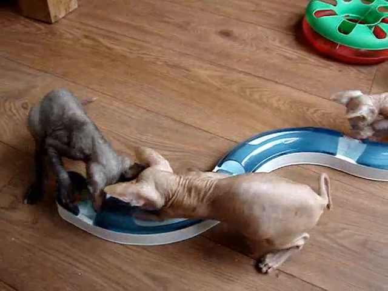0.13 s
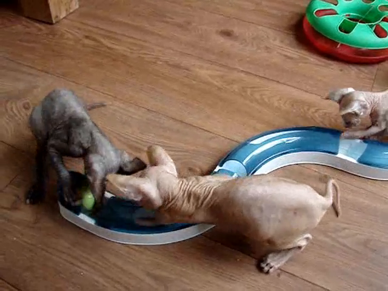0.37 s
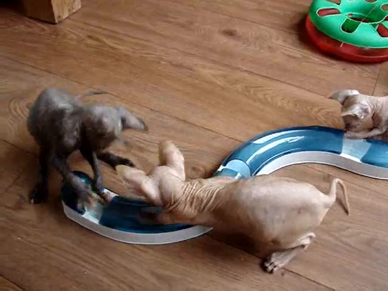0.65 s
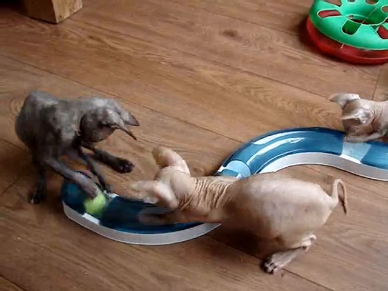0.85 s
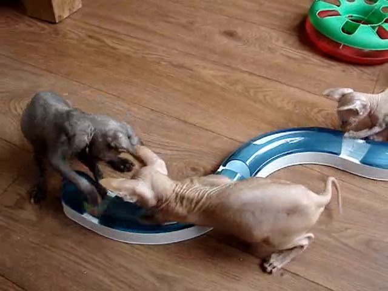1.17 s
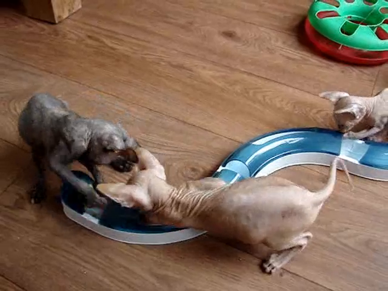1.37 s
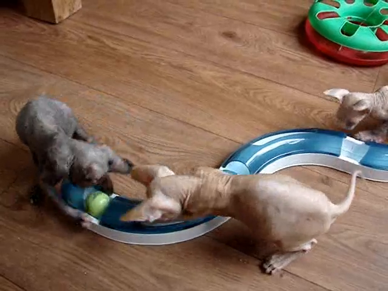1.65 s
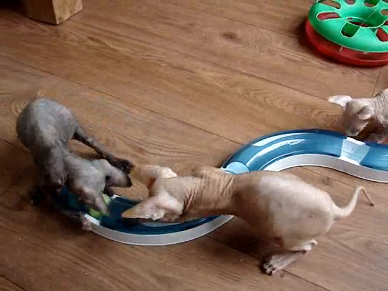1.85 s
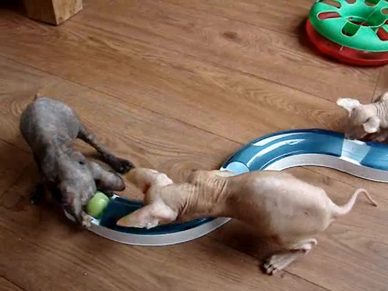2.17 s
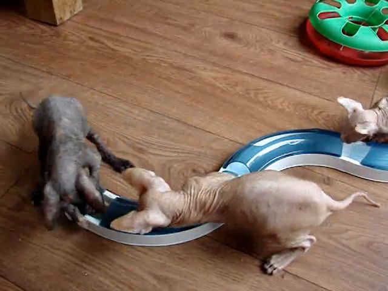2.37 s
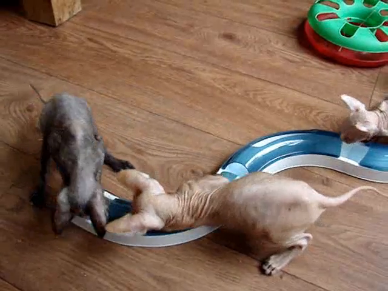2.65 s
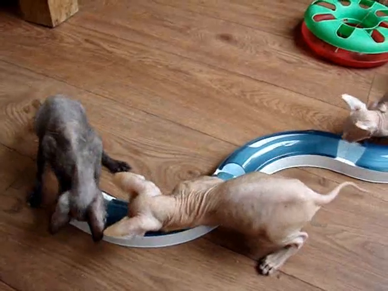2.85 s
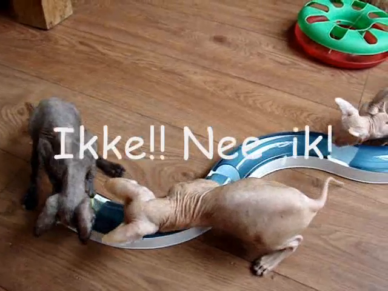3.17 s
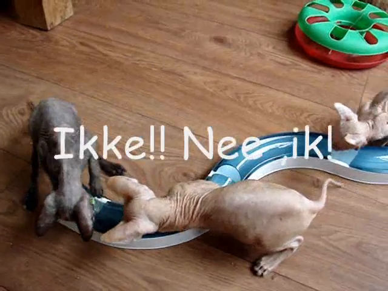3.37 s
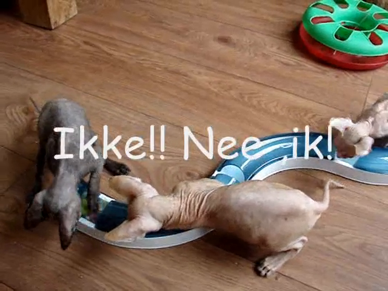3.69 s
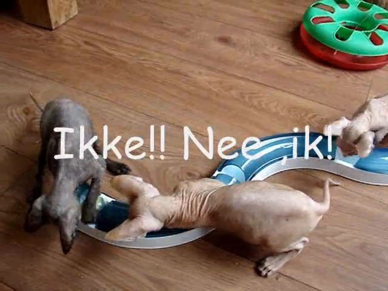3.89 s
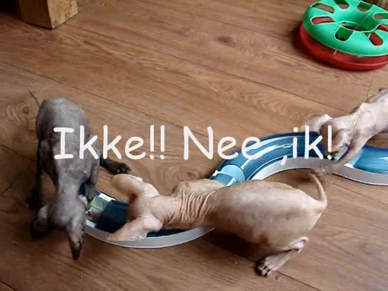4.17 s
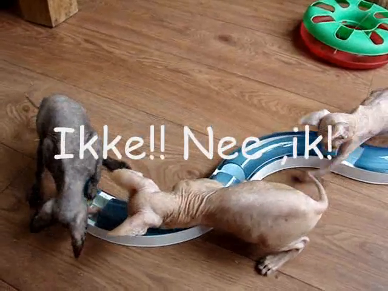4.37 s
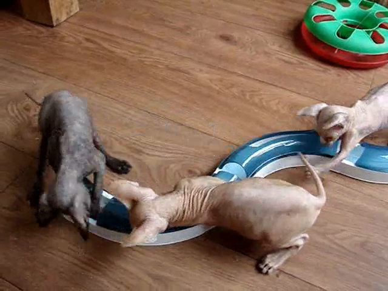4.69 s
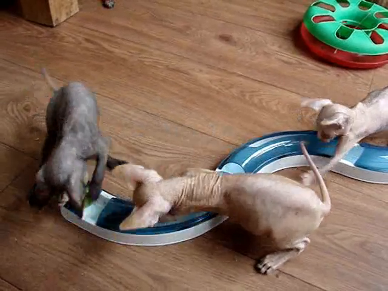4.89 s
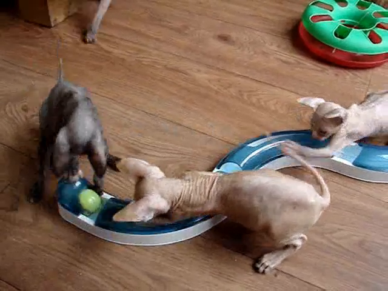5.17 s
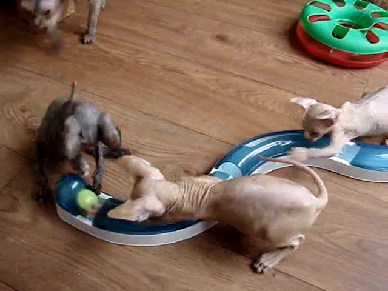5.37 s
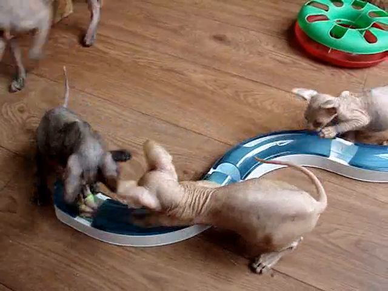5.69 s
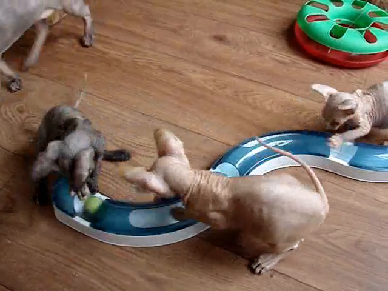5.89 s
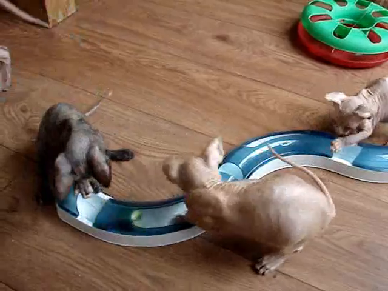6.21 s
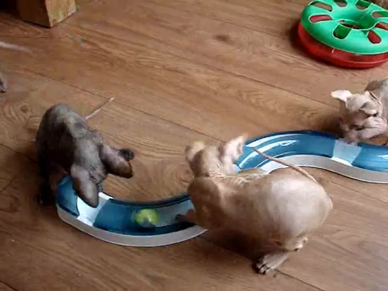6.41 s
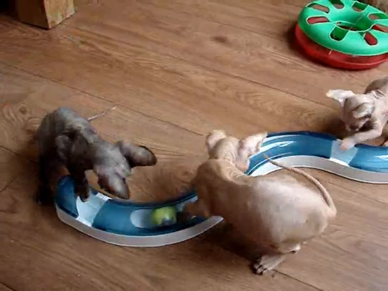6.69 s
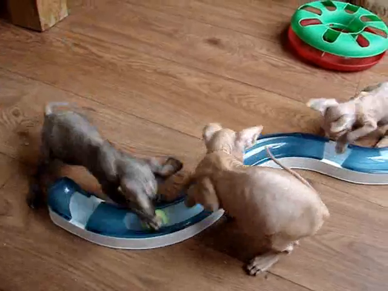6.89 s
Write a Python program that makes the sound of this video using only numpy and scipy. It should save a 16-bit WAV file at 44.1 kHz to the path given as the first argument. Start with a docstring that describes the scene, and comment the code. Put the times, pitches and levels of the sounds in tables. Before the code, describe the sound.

A kitten's paws scuff and knock a hollow ball in a plastic track, in a small live room with a wooden floor and faint steady hiss. From 0 to 0.9 s, quick uneven clicks and rattles cluster together over a soft rolling rumble. At about 1.05 s the loudest swipe cracks the plastic, thumps the boards and makes the ball sing near 2 kHz; low floor grumbles and bumps follow until 1.35 s. Sharp bright clacks come around 1.6, 1.9, 2.1 and 2.3 s, then scuffs and a brief ring at 2.5 and 2.9 s. Softer padded knocks from 3.3 s grow into a busy rattle around 4.0 to 4.5 s. More taps come at 5.0, a sharp clack at 5.3 and a dull knock at 5.5, then a small ring at 5.6 s. The ball glides quietly, bumping track joints from 6.2 to 6.5 s, before light scuffs and taps at 6.7 and 7.0 s.

```python
"""In a small live room with a wooden floor, kittens bat a hollow ball inside a plastic track.
Ball and claws click on the shell and padded paws knock it: short pushes and rattles ring the shell's modes.
Scuffs are swells of tiny slips; after square blows the ball sings on, as a few fading sine tones.
The ball rolls with a soft rumble of filtered noise and rubs the shell, more so after each blow.
One hard swipe thumps the track on the boards and the floor grumbles, over a steady background hiss."""
import sys
import numpy as np
from scipy import signal
from scipy.fft import rfft, irfft, next_fast_len
from scipy.io import wavfile
from scipy.ndimage import map_coordinates

SR = 44100
rng = np.random.default_rng(int(sys.argv[2]) if len(sys.argv) > 2 else 0)


def pcm_store(signal):
    """Save signal as 16-bit PCM."""
    levels = np.round(np.clip(np.atleast_2d(signal), -1, 1) * 32767)
    wavfile.write(sys.argv[1], SR, levels.astype(np.int16).T)


N = 310905  # length of the scene in samples
SPAN = 8192  # length of one short sound in samples
CLOCK = np.arange(SPAN) / SR  # time within a short sound, in seconds


def amp(db):
    """Turn decibels into gain."""
    return 10 ** (np.asarray(db) / 20)


def unit(x):
    """Scale to an rms of 1."""
    return x / np.sqrt(np.mean(x ** 2) + 1e-20)


def along(points, hz):
    """Read a curve of (frequency, value) points on a log frequency axis."""
    f, v = np.transpose(points)
    return np.interp(np.log(hz + 1), np.log(f), v)


def wobble(rate):
    """A smooth random curve with this many random knots a second."""
    knots = rng.standard_normal(int(N * rate / SR) + 4)
    return map_coordinates(knots, [np.arange(N) * rate / SR])


def hump(middle, half):
    """A smooth swell of height 1 around a moment."""
    return np.exp(-((np.arange(N) / SR - middle) / half) ** 2)


def add(track, s, sound):
    """Mix a sound into the track at time s."""
    start = max(round(s * SR), 0)
    part = sound[:max(N - start, 0)]
    track[start:start + len(part)] += part


def resonance(hz, centre, width):
    """Response of one mode: it favours its own pitch and rings on after a push."""
    return 1j * hz * width / (centre ** 2 - hz ** 2 + 1j * hz * width)


def body(modes, hz):
    """Response of an object: the sum of its modes."""
    return sum(amp(db) * resonance(hz, centre, width) for centre, width, db in modes)


def causal(points):
    """Minimum-phase response with the given spectrum, so its energy comes as early as it can."""
    cepstrum = irfft(np.log(amp(along(points, np.fft.rfftfreq(SPAN, 1 / SR)))))
    cepstrum[1:SPAN // 2] *= 2
    cepstrum[SPAN // 2 + 1:] = 0
    return np.exp(rfft(cepstrum))


def filtered(x, response):
    """Shape x by a response that is a function of frequency."""
    size = next_fast_len(len(x) + SPAN)
    return irfft(rfft(x, size) * response(np.fft.rfftfreq(size, 1 / SR)), size)[:len(x)]


# how long the room rings: (frequency [Hz], time to fade by 60 dB [s])
ROOM_DECAY = [(200, 0.33), (800, 0.56), (2000, 0.46), (5500, 0.43), (11000, 0.53)]


def in_room(direct, radiated, tail_db, early_db, early_t60=0.03, build=0.0066):
    """The direct sound plus echoes of what is radiated all round: sharp early ones and a smooth tail."""
    hz, t, z = signal.stft(rng.standard_normal(SR // 2), SR, nperseg=256)
    # each pitch of the noise fades at its own pace
    tail = signal.istft(z * amp(-60 * t / along(ROOM_DECAY, hz)[:, None]), SR)[1]
    t = np.arange(len(tail)) / SR
    tail *= 1 - np.exp(-t / build)
    # cubed noise is spiky, like separate echoes; none comes in the first 5 ms
    early = rng.standard_normal(len(t)) ** 3 * amp(-60 * t / early_t60) * (t > .005)
    tail_part = amp(tail_db) * tail / np.linalg.norm(tail)
    early_part = amp(early_db) * early / np.linalg.norm(early)
    heard = signal.fftconvolve(radiated, tail_part + early_part)
    heard[:SPAN] += direct
    return heard


# spectrum of the steady background: (frequency [Hz], relative level [dB])
BACKGROUND_TONE = [(20, -8), (60, -5.5), (150, -4.5), (280, 3), (700, -5), (1300, -3), (3000, -10),
                   (6000, -14), (10000, -18.5), (11400, -36.5), (13000, -55)]


def background(level_db=-53):
    """Steady room noise and microphone hiss: random noise shaped by a fixed spectrum."""
    return amp(level_db) * unit(filtered(rng.standard_normal(N), lambda hz: amp(along(BACKGROUND_TONE, hz))))


# weight shifting on the boards: (time [s], relative level [dB])
WEIGHT_SHIFTS = [(1.059, -5), (1.19, -1.5), (1.28, -9.5), (1.4, -51)]


def boards(level_db=-48, low_hz=230, width_hz=340):
    """After the hard swipe the floor grumbles in a low band while the kitten shifts its weight."""
    s, db = np.transpose(WEIGHT_SHIFTS)
    swell = amp(np.interp(np.arange(N) / SR, s, db, left=-120, right=-120))
    grumble = unit(filtered(rng.standard_normal(N), lambda hz: resonance(hz, low_hz, width_hz) ** 2))
    return amp(level_db) * swell * grumble


# resonances of the plastic shell: (frequency [Hz], width [Hz], relative level [dB])
SHELL_MODES = [(1570, 760, -1.5), (1611, 38, 3), (1952, 91, 8), (2190, 75, 17), (2444, 230, 16.5),
               (2890, 780, 14), (3750, 1800, 14), (4740, 85, -5)]
# spectrum of the treble click: (frequency [Hz], relative level [dB])
CLICK_TONE = [(1500, -39.5), (3500, 6), (4500, 9), (5400, 4), (6600, 4), (8000, 1), (9400, -3),
              (10400, -53), (11300, -20), (13000, -29.5)]
# spectrum of the low knock: (frequency [Hz], relative level [dB])
KNOCK_TONE = [(60, -31), (170, -23), (280, -6), (500, -3), (700, 1.5), (900, -4), (1150, -7.5), (1800, -42)]
PING_HZ, PING_DB = 10130, -25  # a thin, high ring on every contact: pitch, level over the main ring


def shell_colours():
    """Responses that every contact shares: shell modes, click, knock and ping."""
    hz = np.fft.rfftfreq(SPAN, 1 / SR)
    ping = resonance(hz, PING_HZ, 820) ** 2
    return body(SHELL_MODES, hz), causal(CLICK_TONE), causal(KNOCK_TONE), ping


CUT_ON_HZ = 1294  # the shell radiates poorly below this


def plastic(force, grit, ring_hz, click_db, knock_db, colours, sharpness=1.9, shell_share=0.3, softness=1.37):
    """The spot that is touched picks which shell modes the force rings; fine grit makes the treble click."""
    hz = np.fft.rfftfreq(SPAN, 1 / SR)
    shell, click, knock, ping = colours
    spot = resonance(hz, ring_hz, ring_hz / sharpness) * resonance(hz, ring_hz, ring_hz * 5.0)
    # a contact of finite length cannot drive modes far above its own pitch
    ratio = hz / (softness * ring_hz)
    spot = spot / (1 - ratio ** 2 + 1j * np.sqrt(2) * ratio)
    cut_on = resonance(hz, CUT_ON_HZ, 240) * 1j * hz
    responses = np.array([spot * cut_on * (1 + shell_share * shell), click, knock, ping])
    parts = irfft(rfft(np.array([force, grit, force, grit])) * responses)
    parts /= np.linalg.norm(parts, axis=1, keepdims=True)
    return amp([0, click_db, knock_db, PING_DB]) @ parts


# levels over the ring at hardness 0 and 1, before each source's trim
SOFT_CLICK_DB, HARD_CLICK_DB = -31, 3.5
SOFT_KNOCK_DB, HARD_KNOCK_DB = -4.5, -23.5
# the track gives: dB of knock lost for each dB that a blow is over the usual one, within limits
USUAL_DB, KNOCK_GIVE = -36, 0.71


def touch(db, hardness):
    """Levels of click and knock over the ring: hard contacts click, soft ones knock."""
    click_db = SOFT_CLICK_DB + hardness * (HARD_CLICK_DB - SOFT_CLICK_DB)
    knock_db = SOFT_KNOCK_DB + hardness * (HARD_KNOCK_DB - SOFT_KNOCK_DB)
    return click_db, knock_db - KNOCK_GIVE * np.clip(db - USUAL_DB, -8, 6)


SPIN_DB, SPIN_T60_S = -12, 0.83  # rub against a fully padded blow's table level; time to fade by 60 dB


def spin():
    """Strength of the ball's spin: each blow adds to it, padded ones most, and friction wears it down."""
    kicks = np.zeros(N)
    for s, db, ring_hz, hardness in BLOWS:
        add(kicks, s, [amp(db + SPIN_DB) ** 2 * max(1 - hardness, 0)])
    kept_per_sample = amp(-60 / (SPIN_T60_S * SR)) ** 2
    return np.sqrt(signal.lfilter([1], [1, -kept_per_sample], kicks))


JOINT_HALF_S = 0.017  # half length of a swell at a joint
GLIDE_S, GLIDE_HALF_S, GLIDE_DB = 6, 0.13, -46.5  # one long push slides the ball: middle, half length, rub level
# how briskly the ball rolls: (time [s], relative level [dB])
ROLL_PACE = [(0.0, -41.5), (0.31, -47.5), (0.94, -46), (1.2, -40), (1.35, -46), (1.8, -44.5), (2.16, -48.5),
             (2.63, -45), (3.65, -47.5), (4.12, -45), (4.69, -49.5), (4.97, -47), (5.91, -48),
             (6.36, -46.5), (6.6, -50), (7.05, -48.5)]
# the free ball bumps over joints of the track: (time [s], swell of the rumble [dB])
JOINT_BUMPS = [(6.17, 6), (6.28, 4), (6.5, 5)]
# air resonances of the channel under the ball: (frequency [Hz], width [Hz], relative level [dB])
CHANNEL_MODES = [(269.4, 8.6, -7.5), (407.5, 49, -9), (488, 12, -6), (734, 255, -5), (958, 47, -5.5)]
# spectrum of the ball's skin rubbing the shell: (frequency [Hz], relative level [dB])
RUB_TONE = [(500, -19), (1100, -5.5), (1400, 7.5), (1950, 1), (2300, -6.5), (3000, -12.5), (5000, -18),
            (10000, -13.5), (12000, -67)]


def rolling(rumble_db=-3.0, rub_db=-5, bumps_per_s=70, bump_share=0.31):
    """The ball's seam and small bumps stir the air in the channel, while its skin rubs the shell."""
    pace = amp(np.interp(np.arange(N) / SR, *np.transpose(ROLL_PACE)))
    joints = amp(sum(db * hump(s, JOINT_HALF_S) for s, db in JOINT_BUMPS))
    bumps = unit(rng.standard_normal(N) * (rng.random(N) < bumps_per_s / SR))
    friction = rng.standard_normal(N) * amp(2.8 * wobble(40))
    stir = friction + bump_share * bumps
    rumble = unit(filtered(stir, lambda hz: body(CHANNEL_MODES, hz) * resonance(hz, 500, 2400)))
    rub = unit(filtered(friction, lambda hz: amp(along(RUB_TONE, hz)) * (1 + 0.95 * body(SHELL_MODES, hz))))
    # rolling, spinning and gliding add up as powers
    glide = amp(GLIDE_DB) * hump(GLIDE_S, GLIDE_HALF_S)
    rubbing = np.linalg.norm([amp(rub_db) * pace, spin(), glide], axis=0)
    return amp(rumble_db) * pace * joints * rumble + rubbing * rub


# track and paws landing on the boards: (time [s], peak level [dB], pitch [Hz], time to fade by 60 dB [s])
LANDINGS = [(1.0576, -23, 70, 0.012), (1.135, -34.5, 263, 0.042), (1.18, -36.5, 270, 0.086),
            (1.217, -47, 292, 0.044), (1.271, -40, 287, .04)]


def thumps():
    """Soft, heavy contacts push the floorboards: a low tone that dies away quickly."""
    out = np.zeros(N)
    for s, db, hz, t60 in LANDINGS:
        push = np.sin(2 * np.pi * hz * CLOCK) * amp(-60 * CLOCK / t60)
        add(out, s, amp(db) * push / np.max(push))
    return out


# paws scuffing and the ball chattering:
# (time [s], length [s], relative level [dB], ring pitch [Hz], hardness [0 to 1])
STROKES = [(0, 0.074, -31, 2060, 0.34), (0.146, 0.03, -38, 2010, 0.37), (0.554, .044, -37.5, 1970, .5),
           (0.815, 0.095, -48.5, 2300, 0.86), (1.018, 0.052, -34.5, 1750, 0.4),
           (1.069, 0.023, -47, 1950, 0), (1.215, 0.0072, -28.5, 2780, 0.89), (1.77, .048, -35, 2920, 0.84),
           (2.508, 0.042, -33, 2080, 0.42), (2.934, 0.1, -39, 2080, 0.3), (3.215, 0.04, -45, 2250, 0.66),
           (3.76, 0.055, -38.5, 1750, 0.26), (4.013, 0.033, -33.5, 1620, 0.5),
           (4.461, 0.022, -39.5, 2040, 0.63), (4.847, 0.05, -40.5, 1890, 0.57),
           (4.964, 0.0095, -45.5, 2750, 0.95), (5.072, 0.07, -33, 2040, 0.15),
           (5.576, 0.026, -31, 1970, 0.39), (6.735, 0.025, -39.5, 2330, 0.48),
           (7.015, 0.017, -31, 1740, 0.35)]


def scuffs(colours, level_db=-2, slips_per_s=2500, release=0.015, rub_share=1.0, knock_trim_db=-3):
    """A stroke is a swell of tiny slips, each of a different size, over a smooth rub."""
    out = np.zeros(N)
    for s, length, db, ring_hz, hardness in STROKES:
        click_db, knock_db = touch(db, hardness)
        rise = np.minimum(CLOCK / (0.028 * length), 1)
        swell = rise * np.exp(-np.maximum(CLOCK - length, 0) / release)
        slips = unit(rng.standard_normal(SPAN) * (rng.random(SPAN) < slips_per_s / SR))
        friction = swell * (slips + rub_share * rng.standard_normal(SPAN))
        stroke = plastic(friction, friction, ring_hz, click_db, knock_db + knock_trim_db, colours)
        # a longer stroke carries more energy
        gain = amp(db + level_db) * np.sqrt(length * SR)
        add(out, s, gain * in_room(stroke, stroke, tail_db=-9.5, early_db=-16))
    return out


# blows that set the hollow ball singing: (time [s], relative level [dB])
SINGING_BLOWS = [(.055, -39), (1.0605, -15), (1.091, -38), (2.523, -29), (2.945, -28.5), (4.2, -37),
                 (5.088, -38), (5.591, -26)]
# modes of the ball: (frequency [Hz], typical relative level [dB], time to fade by 60 dB [s])
BALL_MODES = [(1920, -24, 0.48), (2007, -6, 0.2), (2094, 8.5, 0.019), (2050, -15, 0.21), (3450, -46, 0.051),
              (6740, -23, 0.065)]


def ball_ring(level_db=0, attack=0.0011):
    """The hollow ball sings on near 2 kHz after a square blow: each mode is a fading sine."""
    out = np.zeros(N)
    for s, db in SINGING_BLOWS:
        ring = np.zeros(SPAN)
        for hz, level, t60 in BALL_MODES:
            # every blow excites each mode a little differently
            fade = amp(level + rng.normal(0, 1) - 60 * CLOCK / t60)
            ring += fade * np.sin(2 * np.pi * hz * CLOCK)
        ring *= 1 - np.exp(-CLOCK / attack)
        add(out, s, amp(db + level_db) * in_room(ring, ring, tail_db=-8, early_db=-29))
    return out


BUZZ_T60_S = 0.028  # time for the buzz to fade by 60 dB after a fully padded blow
HARD_BUZZ = 0.54  # longer by this share at hardness 1


def buzz_t60(hardness):
    """Padded paws damp the loose joints; hard contacts leave them buzzing longer."""
    return BUZZ_T60_S * (1 + HARD_BUZZ * hardness)


# ball, paws and claws striking the track: (time [s], relative level [dB], ring pitch [Hz],
# hardness [0 = padded paw to 1 = bare ball or claw])
BLOWS = [(.055, -31, 2150, 0.14), (0.1, -33, 1600, 0.35), (0.125, -33, 2200, 0.28), (.159, -33.5, 2130, .3),
         (0.323, -35.5, 2350, 0.79), (0.386, -33, 2320, .5), (.498, -32, 1980, 0.53),
         (0.569, -34, 1990, 0.65), (.635, -35, 1570, 0.45), (.643, -35.5, 2560, 0.93),
         (0.719, -40.5, 2100, 0.54), (0.846, -41.5, 2020, 0.072), (.989, -35.5, 2040, .45),
         (1.05, -23.5, 2420, 0.68), (1.058, -19, 1950, 0.23), (1.061, -26.5, 2180, .2),
         (1.149, -33, 2300, .5), (1.206, -30, 1400, 0.092), (1.313, -26, 2630, 0.6),
         (1.342, -32.5, 2540, 0.8), (1.469, -40.5, 2010, 0.47), (1.58, -29, 2970, 0.65),
         (1.594, -27.5, 2050, 0.64), (1.718, -34, 1870, 0.29), (1.875, -25.5, 2540, 0.88),
         (2.083, -29, 2500, 0.88), (2.305, -23.5, 2800, 0.83), (2.312, -32.5, 3040, 0.86),
         (2.461, -33, 2240, 0.65), (2.477, -38.5, 2550, 0.92), (2.506, -31, 2170, 0.66),
         (2.522, -37, 1990, 0.38), (2.656, -42, 1620, 0.38), (2.682, -30, 1810, 0.28),
         (2.78, -49.5, 1790, 0.8), (2.842, -40.5, 1460, .55), (2.931, -32, 2060, 0.15),
         (3.052, -38, 1870, 0.51), (3.322, -31.5, 1820, 0.028), (3.451, -35.5, 1800, 0.056),
         (3.599, -40, 1930, 0.56), (3.756, -45, 1560, 0.64), (3.795, -32.5, 1740, .02),
         (3.94, -35.5, 2400, 0.77), (3.958, -32.5, 2300, 0.61), (4.011, -37, 1840, 0.45),
         (4.037, -31, 1620, 0.41), (4.049, -39, 1700, 0.53), (4.189, -32, 2380, 0.82),
         (4.2, -30.5, 2400, 0.54), (4.252, -31.5, 1920, 0.2), (4.26, -32, 1850, .35),
         (4.278, -29.5, 1450, 0.37), (4.417, -29.5, 3300, 0.71), (4.514, -31, 1480, 0.23),
         (4.71, -38.5, 1900, 0.093), (4.848, -38, 1970, 0.27), (5.011, -33.5, 1560, 0.36),
         (5.022, -28, 2320, 0.59), (5.06, -39, 1970, 0.72), (5.086, -30.5, 2150, 0.099),
         (5.137, -33.5, 2500, 0.97), (5.286, -24, 2400, 0.77), (5.492, -27, 1440, 0.067),
         (5.509, -55, 1570, 0.36), (5.591, -44, 2010, 0.63), (5.644, -41.5, 2020, 0.7),
         (6.671, -48, 2150, 0.63), (6.752, -41, 2580, 0.44), (6.996, -41.5, 2400, 0.53),
         (7.021, -38.5, 1550, 0.5)]


def hits(colours, level_db=26, push_share=0.94, bounce_share=0.73, bounce_gap=0.0023, rise=0.00029,
         click_trim_db=-2, knock_trim_db=0):
    """Each blow is a push, a run of tiny rebounds and a short buzz in the loose joints."""
    out = np.zeros(N)
    tap = signal.unit_impulse(SPAN)
    for s, db, ring_hz, hardness in BLOWS:
        click_db, knock_db = touch(db, hardness)
        t60 = buzz_t60(hardness)
        fade = amp(-60 * CLOCK / t60)
        buzz = rng.standard_normal(SPAN) * fade * (1 - np.exp(-CLOCK / rise))
        # the longer a contact rattles, the more of it is buzz rather than push
        force = t60 / 0.021 * buzz / np.linalg.norm(buzz) - push_share * tap
        gaps = rng.uniform(0.542, 1.5, size=5) * bounce_gap
        rebounds = (np.cumsum(gaps) * SR).astype(int)
        force[rebounds] += bounce_share * fade[rebounds] * rng.choice([-1, 1], size=5)
        timbre = ring_hz, click_db + click_trim_db, knock_db + knock_trim_db, colours
        direct = plastic(force, buzz, *timbre)
        # summed over all directions the rattle evens out to the spectrum of one clean tap
        radiated = plastic(tap, tap, *timbre)
        blow = in_room(direct, radiated, tail_db=-4.0, early_db=-11)
        add(out, s + 0.00055, amp(db + level_db) * blow)
    return out


def scene():
    """Everything that the toy and the room give, at one microphone."""
    colours = shell_colours()
    floor = background() + boards() + thumps()
    toy = rolling() + scuffs(colours) + ball_ring() + hits(colours)
    return (floor + toy)[None]


TOP_HZ = 13100  # nothing is kept from here up
# tone of the highest treble: (frequency [Hz], gain [dB])
TOP_TREBLE = [(10400, 0.5), (11300, 9.5), (11900, 1), (13000, -2)]


def record(dry):
    """The treble is lifted around 11 kHz and stops short at the band limit."""
    return filtered(dry[0], lambda hz: amp(along(TOP_TREBLE, hz)) * (hz < TOP_HZ))[None]


dry = scene()
out = record(dry)
pcm_store(out)
```